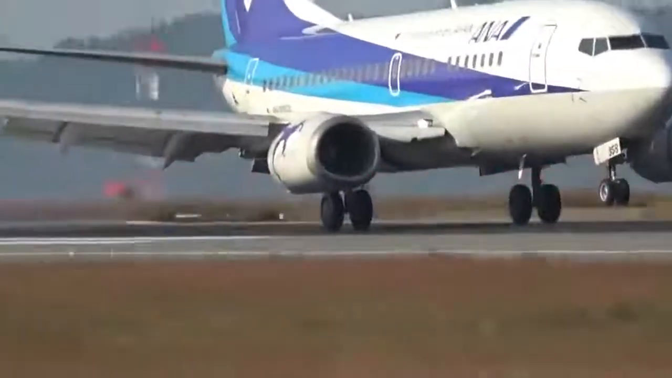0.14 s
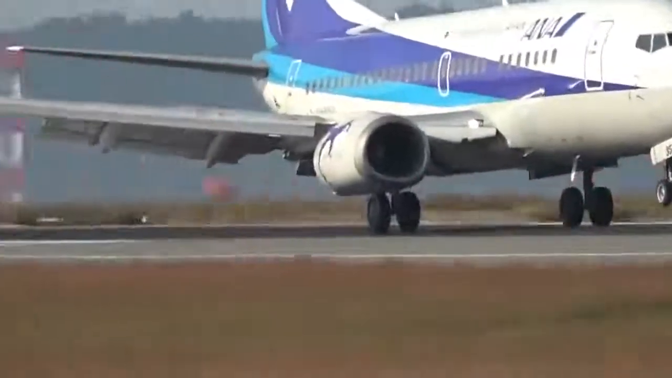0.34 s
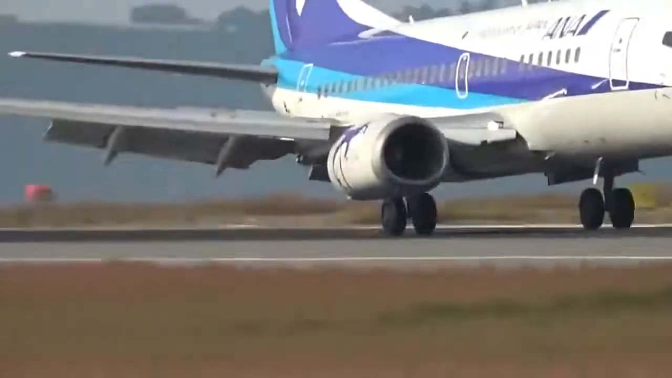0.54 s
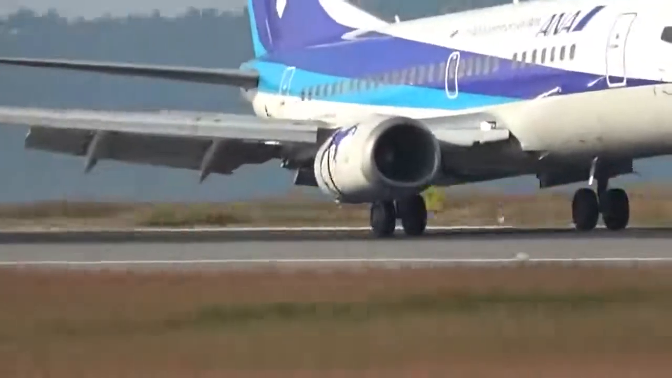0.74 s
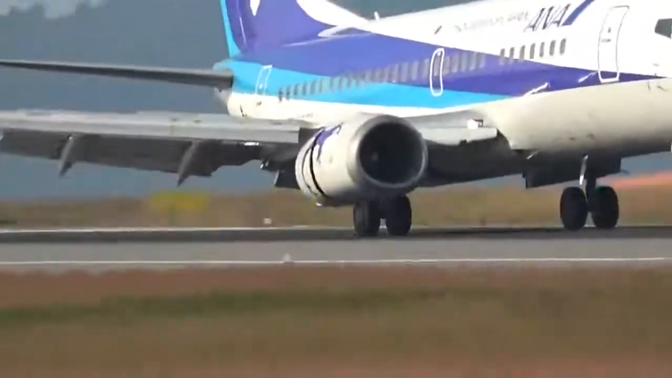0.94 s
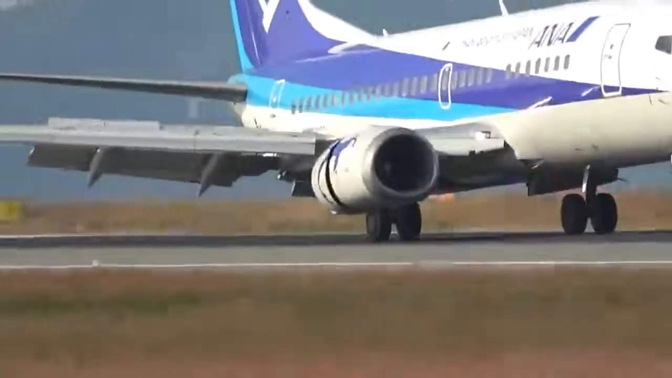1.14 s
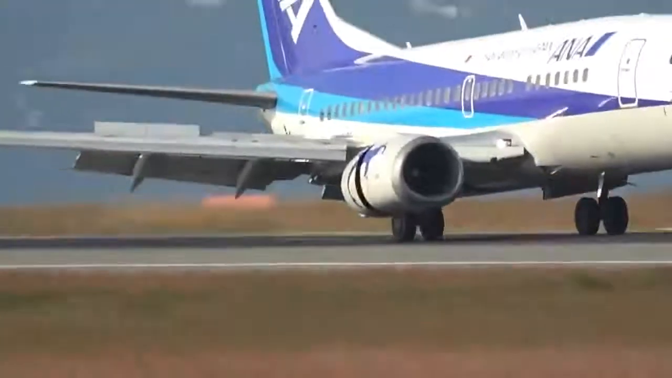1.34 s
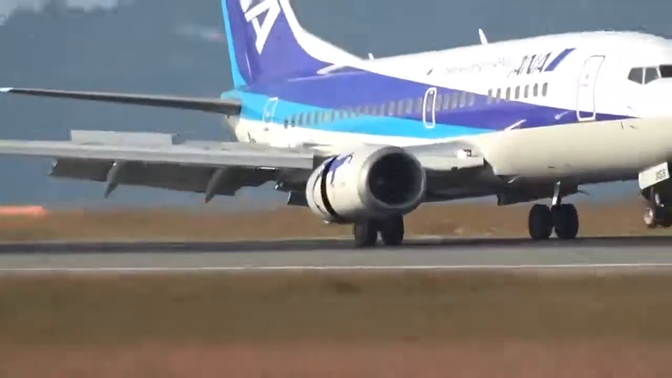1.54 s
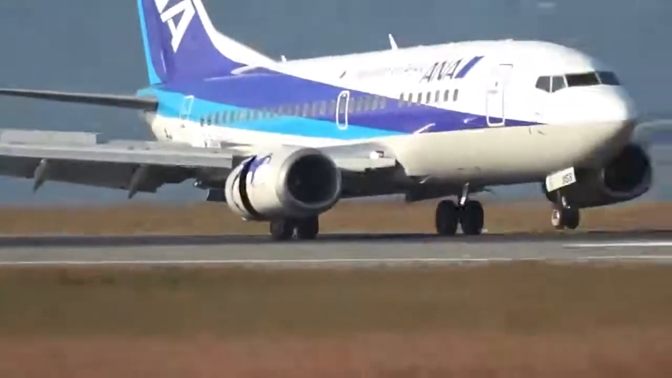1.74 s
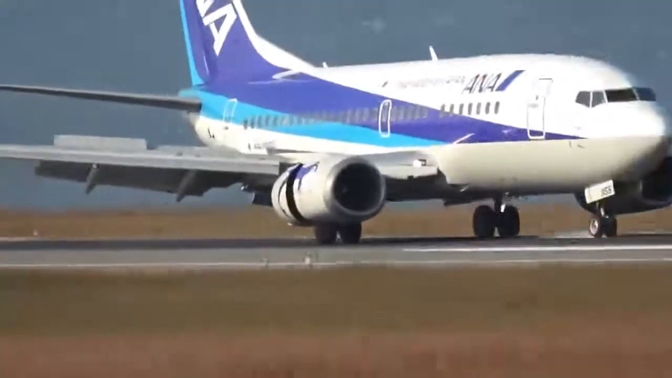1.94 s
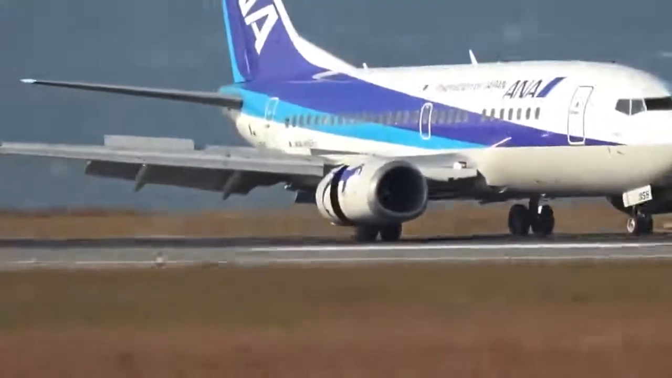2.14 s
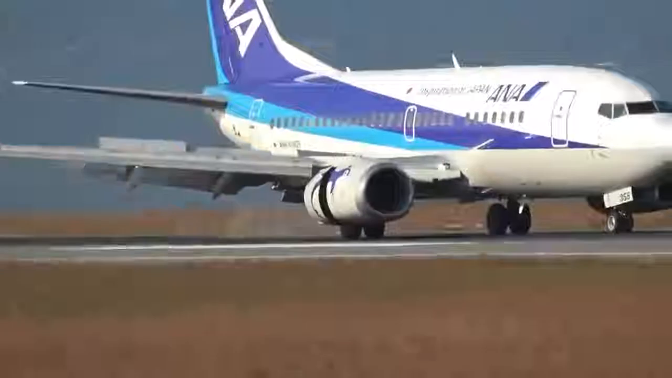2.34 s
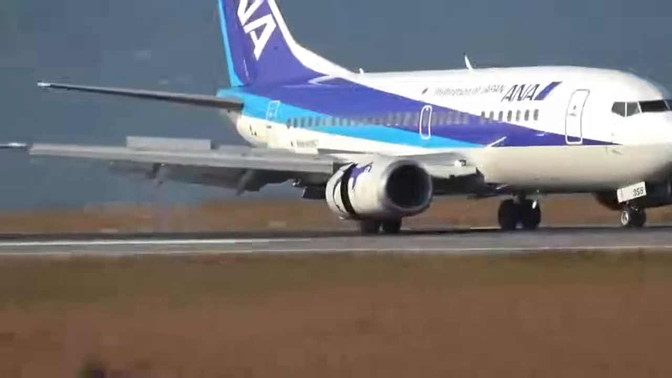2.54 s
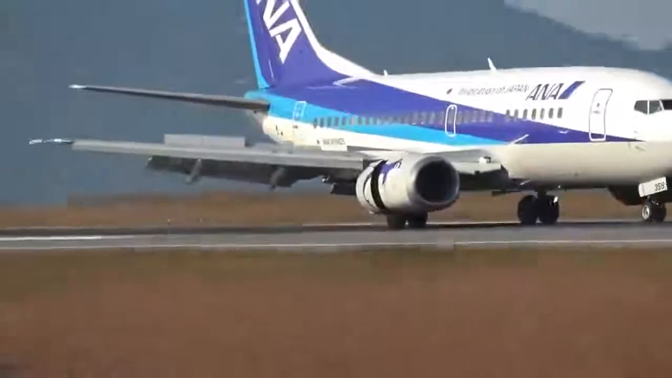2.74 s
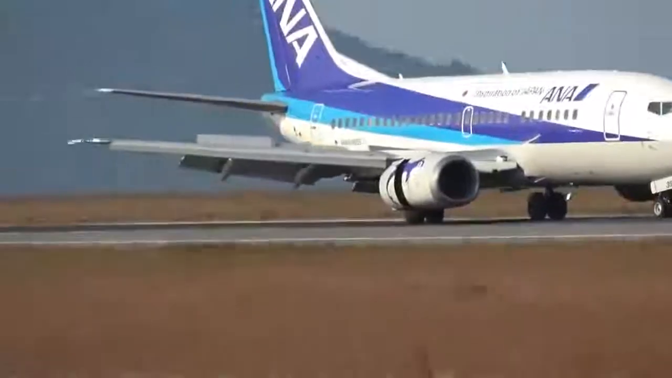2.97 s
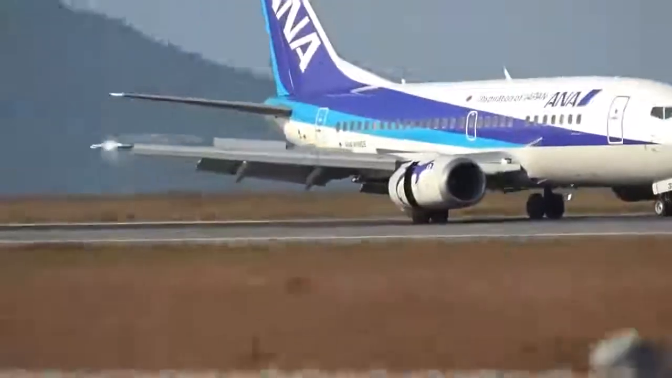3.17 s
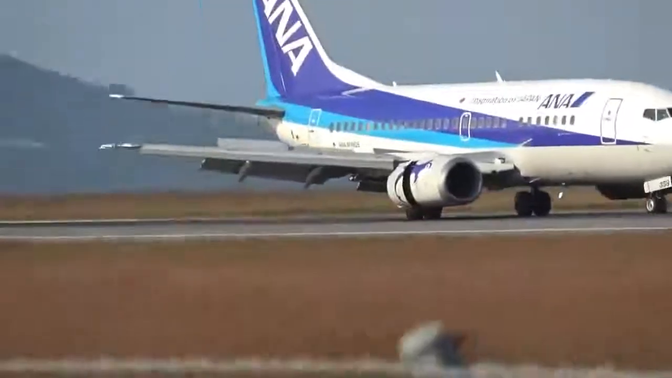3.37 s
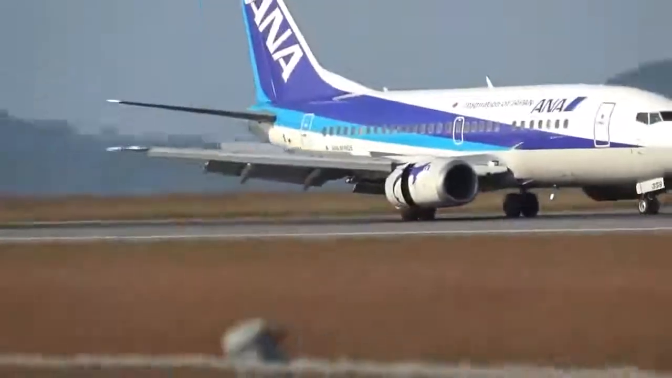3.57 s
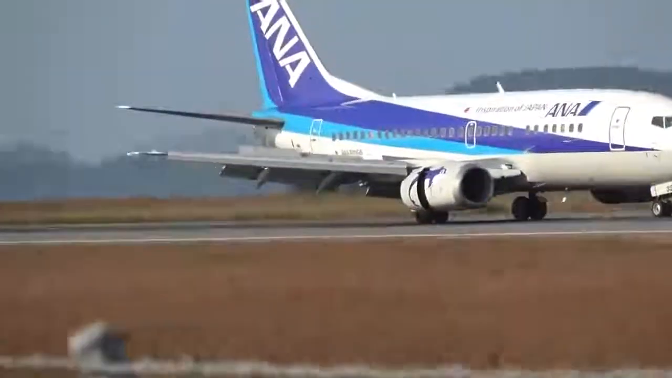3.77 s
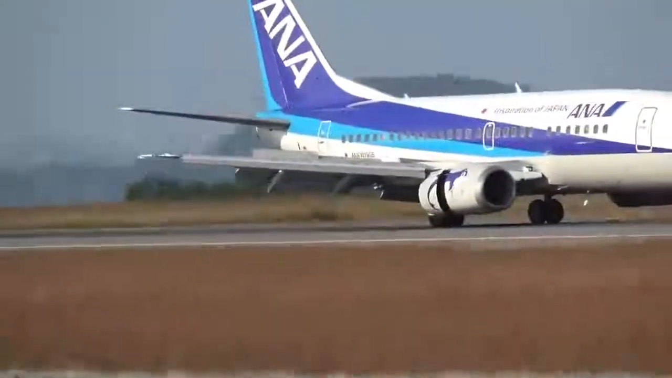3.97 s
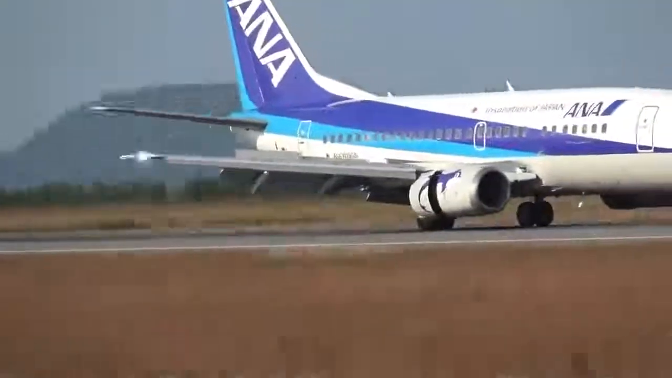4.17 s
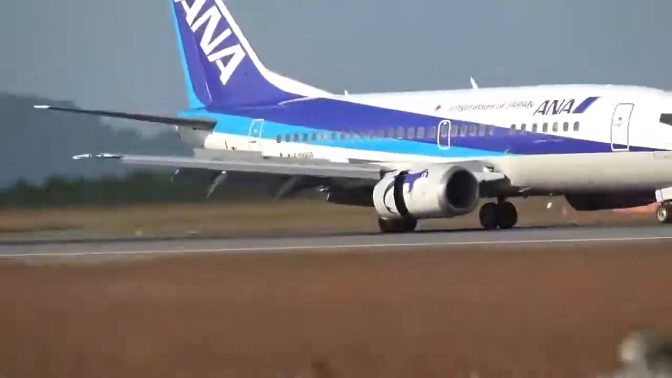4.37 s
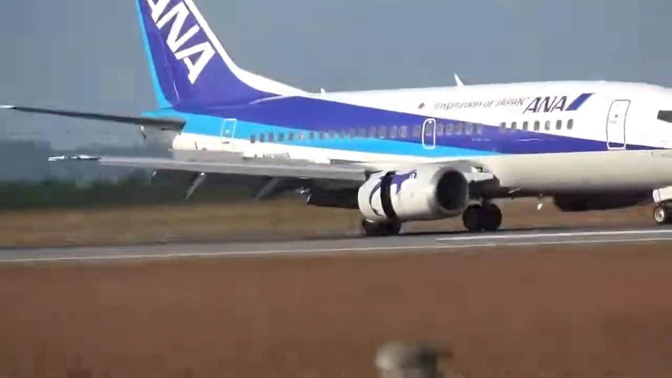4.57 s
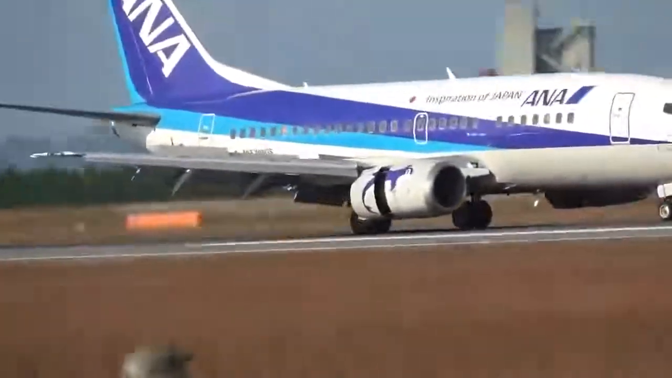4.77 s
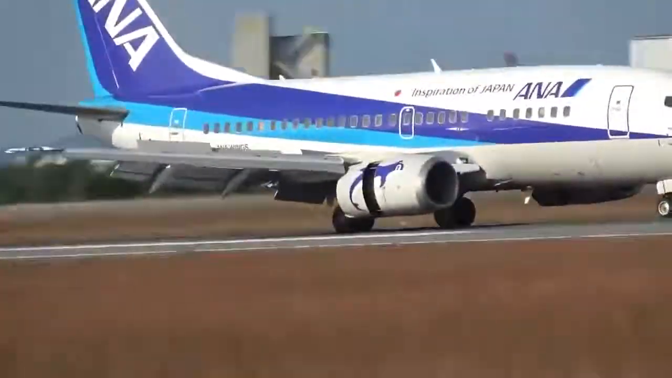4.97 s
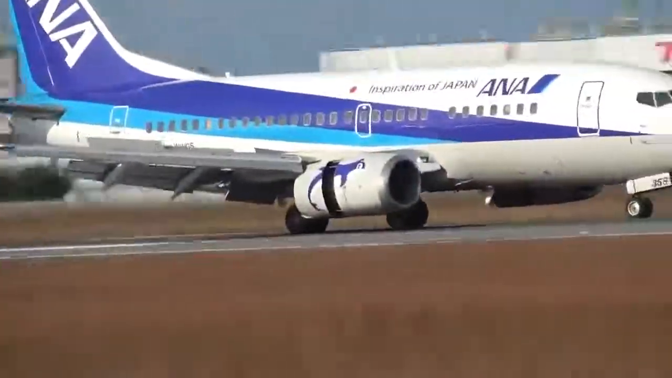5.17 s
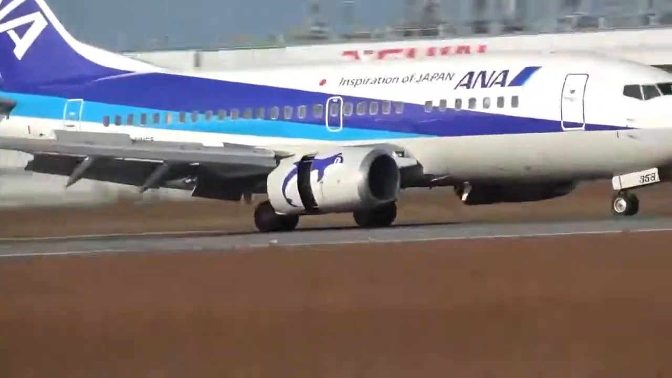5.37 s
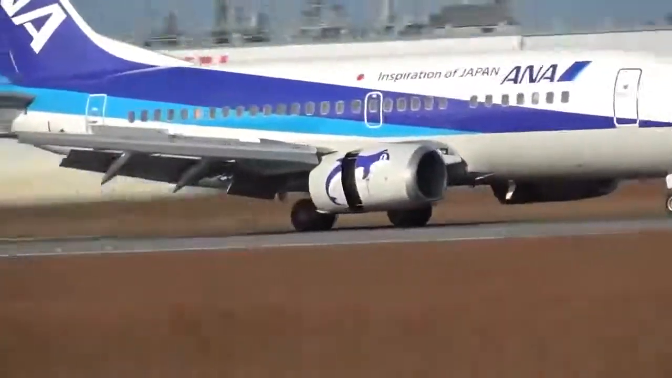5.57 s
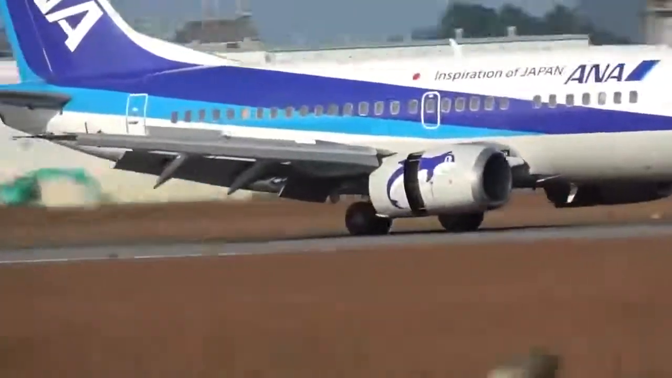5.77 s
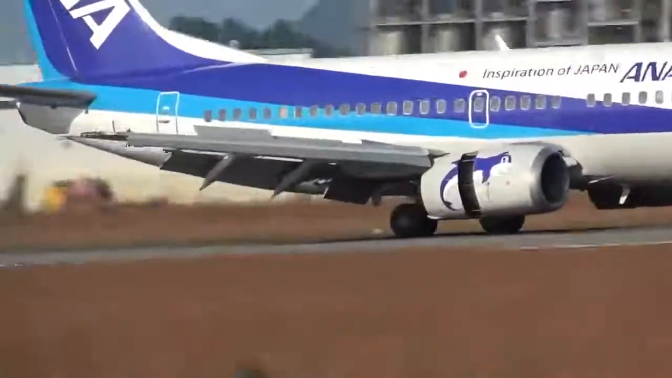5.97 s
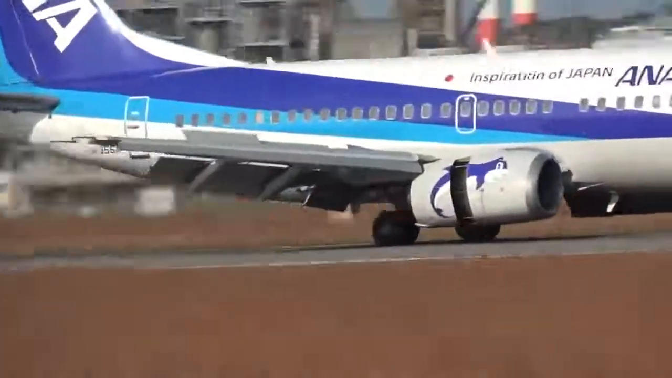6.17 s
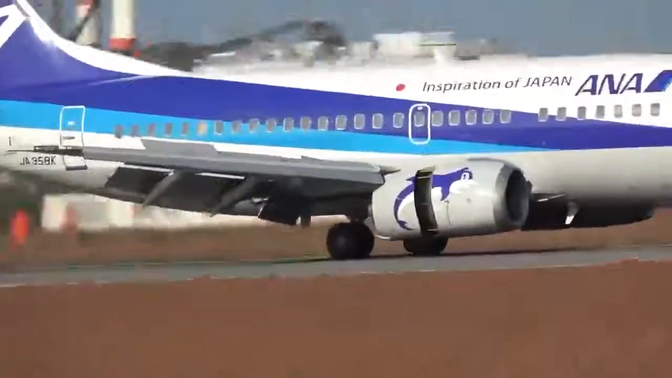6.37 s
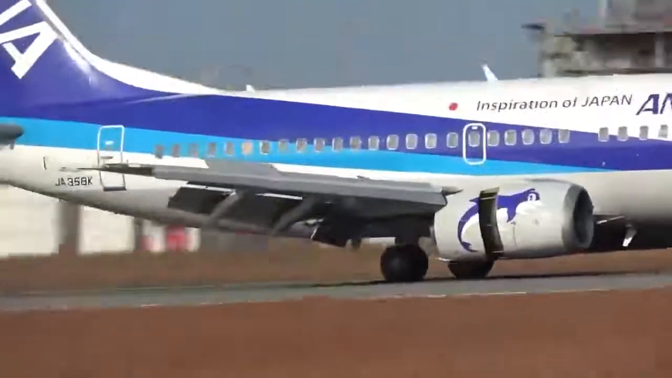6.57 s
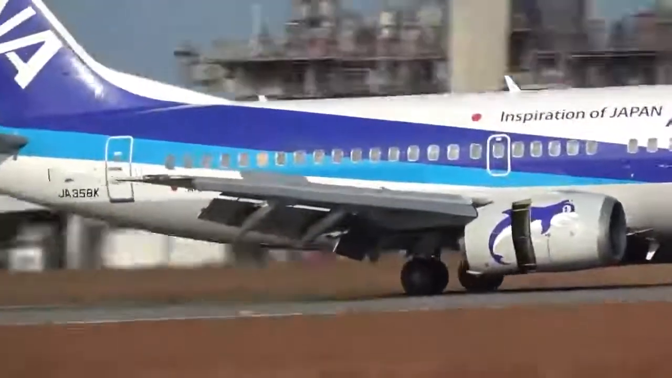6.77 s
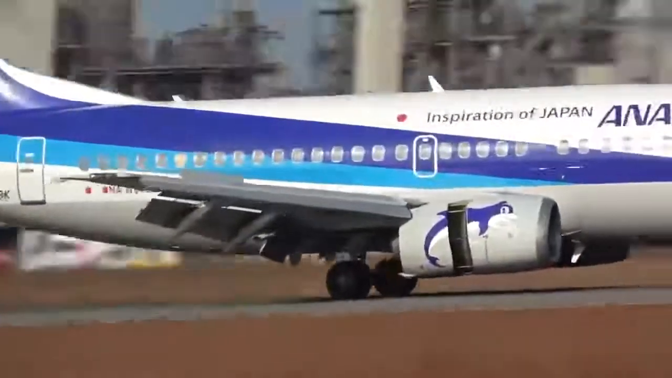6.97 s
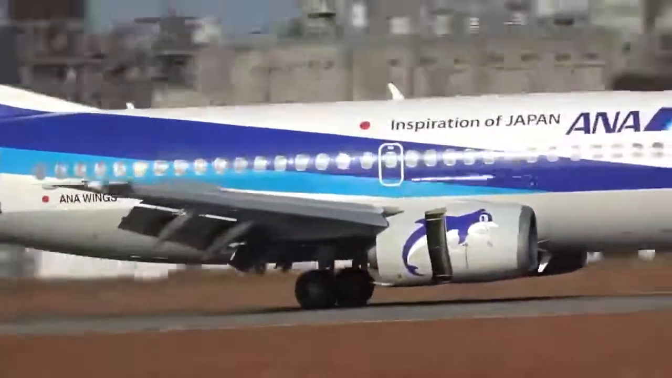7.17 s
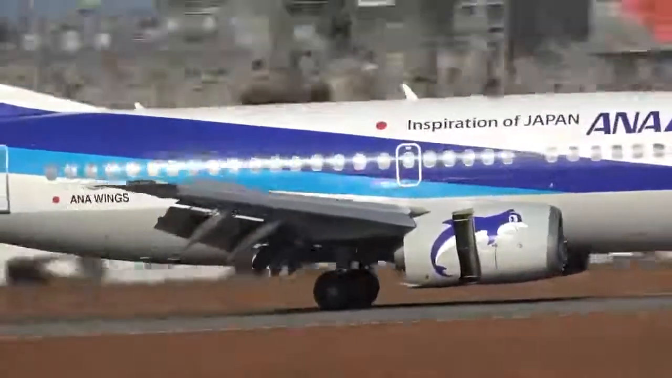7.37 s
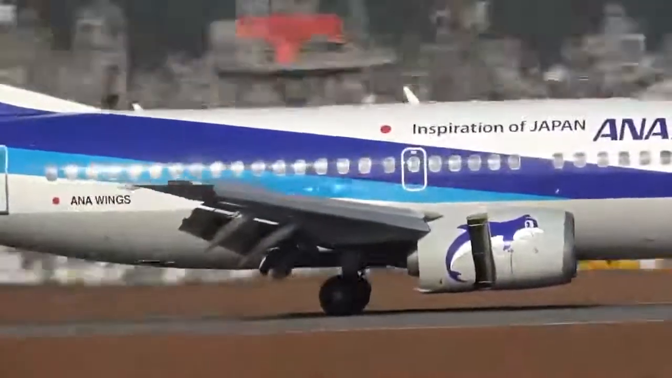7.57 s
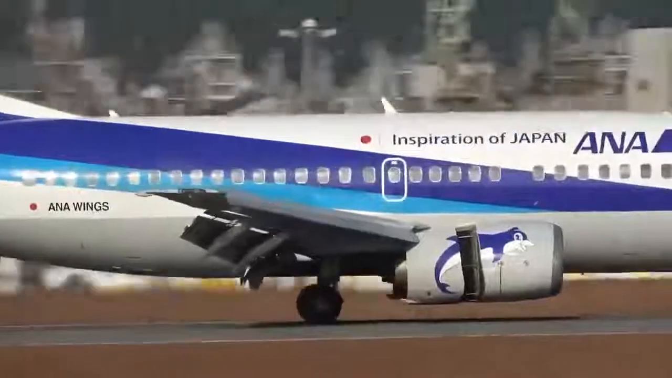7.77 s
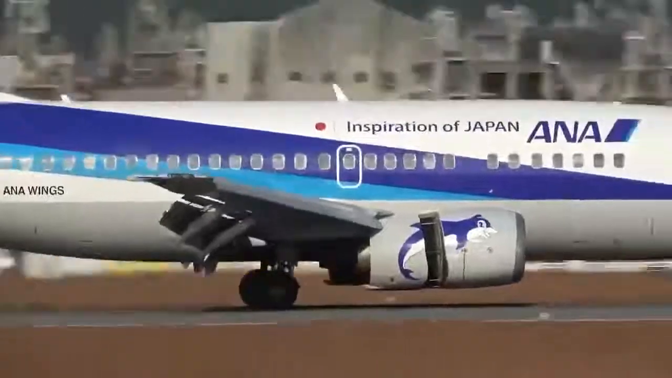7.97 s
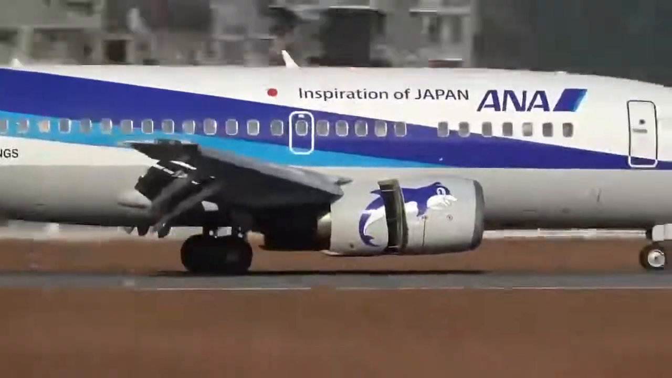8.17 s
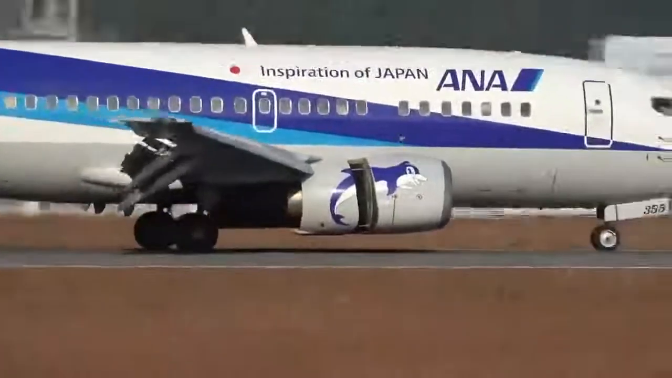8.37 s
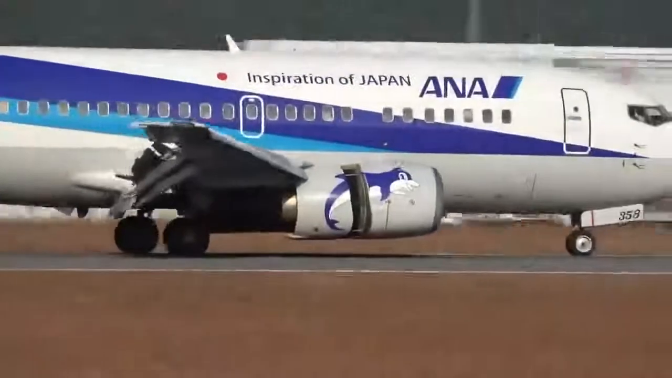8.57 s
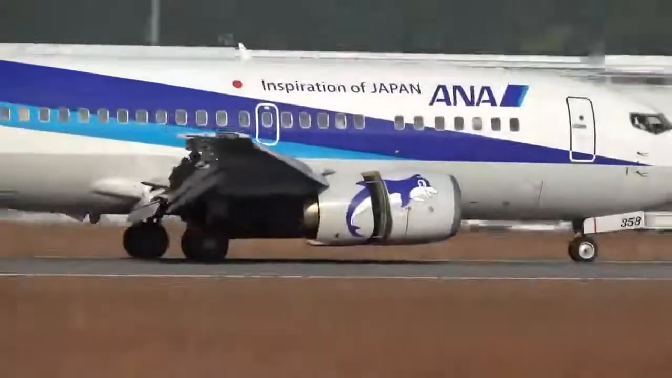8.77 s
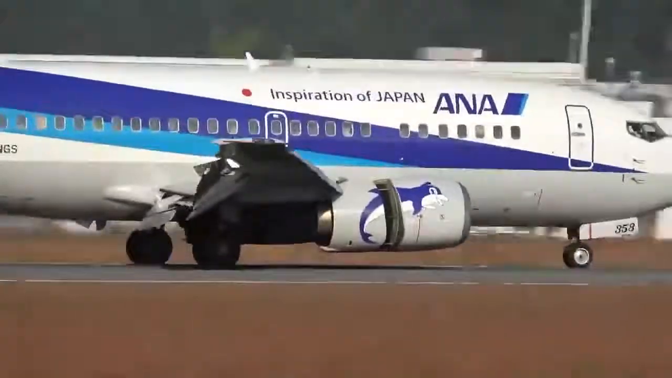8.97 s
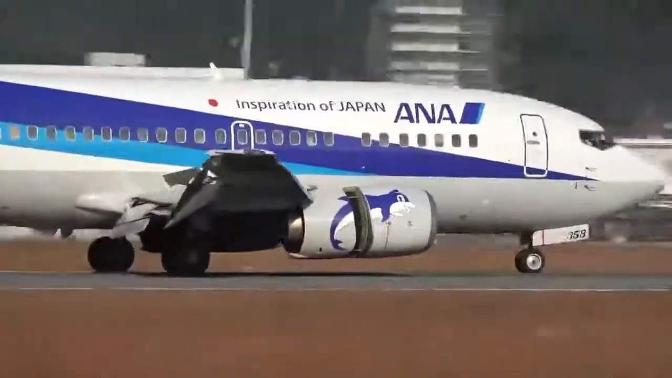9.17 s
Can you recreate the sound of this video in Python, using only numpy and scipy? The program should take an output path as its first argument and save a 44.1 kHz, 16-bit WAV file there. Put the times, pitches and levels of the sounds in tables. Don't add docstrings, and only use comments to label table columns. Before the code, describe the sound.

Across an open grass airfield, a distant airliner's engines drone faintly while wind softly thumps the microphone. Reverse thrust builds as it rolls closer, a fluttering roar with a descending fan tone and brief rising compressor whines. It becomes a loud, broad rush alongside, then eases slightly while still roaring.

```python
import sys
import numpy as np
from scipy import signal
from scipy.io import wavfile
from scipy.ndimage import uniform_filter1d, map_coordinates

SR = 44100
rng = np.random.default_rng(int(sys.argv[2]) if len(sys.argv) > 2 else 0)


def waveform_to_disk(signal):
    frames = np.transpose(np.atleast_2d(signal))
    scaled = np.clip(frames, -1, 1) * 32767
    samples = np.round(scaled).astype(np.int16)
    wavfile.write(sys.argv[1], SR, samples)


def gain_from_db(level_db):
    decades = np.asarray(level_db, float) / 20
    return 10 ** decades


N = 406602
FRAME = 1024
HZ = np.fft.rfftfreq(FRAME, 1 / SR)[:, None]
TIMES = np.arange(2 * N // FRAME + 2) * FRAME / 2 / SR
SECONDS = np.arange(N) / SR

# t/s, distance/km, grass dip f/Hz, roar centre f/Hz, rumble tilt/(dB per octave)
PATH = [(0, 0.84, 333, 784, -0.5), (.65, 0.8, 380, 780, -1.5), (1.05, 0.93, 375, 960, 2),
        (2.1, 0.65, 318, 930, 3.5), (2.8, 0.56, 365, 890, -2), (3.4, 0.39, 272, 940, 6),
        (3.9, 0.41, 250, 1040, -1), (5.2, 0.21, 269, 937, 1.5), (5.6, 0.12, 240, 825, 2.3),
        (6.1, 0.12, 248, 865, 4.5), (6.52, 0.15, 256, 860, -3.5), (6.72, 0.15, 308, 766, -1.5),
        (7.6, 0.12, 326, 800, 2.5), (8.2, 0.083, 392, 860, 1), (8.6, 0.1, 360, 890, 8.5),
        (9.22, 0.16, 342, 917, 2.5)]
# t/s, f/Hz
FAN_PITCH = [(.9, 2590), (1.7, 2550), (2.5, 2460), (3.5, 2325), (4.25, 2215), (4.6, 2140), (5.4, 2030),
             (6.1, 1900)]
# t/s, hiss swell/dB, half width/s
EDDIES = [(.03, 2, 0.05), (.72, 5, 0.14), (1.0, 10, 0.12), (1.34, 12, 0.16), (1.66, 8, 0.17),
          (1.93, 3, 0.041), (2.44, 6, 0.1), (2.88, 5.5, 0.046), (3.22, 5, 0.09), (3.52, 2.5, 0.07),
          (3.7, 3, 0.12), (3.9, 4.5, 0.064), (4.37, 6, 0.13), (4.75, -0.5, 0.095), (5.07, 3, 0.13),
          (5.58, 3, 0.085), (5.87, 4, .08), (6.09, 1, 0.062), (6.34, 4.5, 0.065), (6.65, 5, .08),
          (6.92, 0.5, 0.033), (7.25, 2.5, 0.12), (7.44, 3, 0.022), (7.64, 5.5, .06), (7.95, 4, .1),
          (8.15, 1, 0.086), (8.24, -1.5, .05), (8.4, 7, 0.057), (8.67, 1, 0.042), (8.84, 5.5, 0.15)]
RUSH_SWELL, ROAR_SWELL = 0.45, -0.28
BROADSIDE_S, TURN_S = 6.1, 0.15


def unit(x):
    return x / np.sqrt(np.mean(x ** 2) + 1e-20)


def along(points, hz):
    f, v = np.transpose(points)
    return np.interp(np.log(hz + 1), np.log(f + 1), v)


def curves(rows, t):
    s, *cols = np.transpose(rows)
    return [np.interp(t, s, c) for c in cols]


def swells(rows, t):
    return sum(db * np.exp(-((t - s) / width) ** 2) for s, db, width in rows)


def past(t, at_s):
    return (1 + np.tanh((t - at_s) / TURN_S)) / 2


def wobble(rate):
    knots = rng.standard_normal(int(N * 40 / SR))
    return map_coordinates(knots, [np.arange(N) * min(rate, 39) / SR])


def noise(gain):
    z = signal.stft(rng.standard_normal((2, N + FRAME)), nperseg=FRAME)[2][..., :len(TIMES)]
    return signal.istft(z * gain, nperseg=FRAME)[1][:, :N]


def field():
    # f/Hz, density/dB
    murmur = [(40, -2.5), (150, -12.5), (700, -4), (2000, -24), (5000, -27.5), (10800, -31), (11200, -120)]
    return gain_from_db(-48.5) * unit(noise(gain_from_db(along(murmur, HZ))))


def wind():
    # t/s, level/dB
    breeze = [(0, -41), (1.2, -41), (1.7, -45), (9.22, -50.5)]
    # f/Hz, density/dB
    buffet = [(10, -4), (30, 13.5), (60, -1), (120, -28), (300, -42.5), (800, -120)]
    # t/s, swell/dB, half width/s
    puffs = [
        (3.03, 14, .15),
        (4.0, 8.5, .3),
        (8.1, 7, .2),
    ]
    # t/s, peak level/dB, f/Hz, left-right/dB
    gusts = [
        (0.189, -23.5, 46.3, -12),
        (0.569, -33, 45.4, -17),
        (0.759, -25.5, 35.0, 9),
        (2.199, -32, 60, -6.0),
        (2.899, -41, 70.0, 0.5),
        (3.439, -35, 70.0, -3),
        (4.06, -22, 40.4, -16),
    ]
    lumps = gain_from_db(3 * wobble(9) + 2.5 * np.array([wobble(9), wobble(9)]))
    level_db = curves(breeze, SECONDS)[0] + swells(puffs, SECONDS)
    port_db = np.array([[5], [1.5]])
    out = gain_from_db(level_db + port_db) * unit(lumps * noise(gain_from_db(along(buffet, HZ))))
    for s, db, hz, pan_db in gusts:
        bell = np.exp(-((SECONDS - s - 0.012) / 0.017) ** 2)
        push = bell * np.sin(2 * np.pi * hz * (SECONDS - s))
        out += gain_from_db(db + np.array([[pan_db / 2], [-pan_db / 2]])) * push
    return out


def tone(rows, blur_hz, flutter_db, trim_db):
    hz, db = curves(rows, SECONDS)
    edge_s = np.minimum(SECONDS - rows[0][0] + 0.027, rows[-1][0] - SECONDS)
    fade = np.clip(edge_s / 0.2, 0, 1)
    phase = 2 * np.pi * np.cumsum(hz + blur_hz * wobble(30)) / SR
    return np.sqrt(2) * fade * gain_from_db(db + trim_db + flutter_db * wobble(12)) * np.sin(phase)


def idle_tones():
    # t/s, f/Hz, level/dB
    drone = [(0, 662, -48.5), (.25, 665, -54), (.6, 668, -54), (.95, 670, -50), (1.4, 660, -66)]
    # t/s, f/Hz, level/dB
    far_idle = [(1.1, 1915, -52), (1.5, 1870, -50), (1.95, 1836, -45), (2.35, 1824, -50), (2.6, 1790, -52)]
    near = tone(drone, blur_hz=7, flutter_db=3, trim_db=0)
    return near + tone(far_idle, blur_hz=60, flutter_db=2, trim_db=-2)


def layer_levels(t):
    # t/s, thrust level/dB, lift/dB
    thrust = [(0, -40, -9), (1.02, -40, -4.5), (1.3, -38.5, -8), (1.95, -34, 0), (2.6, -30.5, -10.5),
              (3.02, -26, -15.5), (3.35, -25, -2.5), (3.68, -21.5, -7.5), (3.82, -21, 1), (4.4, -25, 8.5),
              (4.9, -23, -0.5), (5.2, -21.5, 3.5), (5.8, -22.5, 8.5), (6.5, -20.5, 7), (6.66, -18, 2.5),
              (7.4, -18.5, 3), (8.9, -22, 8.5), (9.22, -23.5, 6.5)]
    thrust_db, lift_db = curves(thrust, t)
    swell_db, above_db = swells(EDDIES, t), thrust_db + 22
    roar_db = thrust_db + lift_db + ROAR_SWELL * swell_db
    rush_db = -22.5 + 1.08 * above_db + 0.48 * lift_db
    rush_db = rush_db - 3.5 * past(t, BROADSIDE_S)
    hiss_db = -33.5 + 0.57 * above_db + 0.26 * lift_db
    hiss_db = hiss_db - 16 * curves(PATH, t)[0]
    return thrust_db, roar_db, rush_db + RUSH_SWELL * swell_db, hiss_db + swell_db


def patches(depth_db):
    grain = rng.standard_normal((len(HZ), len(TIMES)))
    grain = uniform_filter1d(uniform_filter1d(grain, size=14, axis=0), size=7, axis=1)
    return gain_from_db(depth_db * unit(grain))


def in_band(shape, lo_hz, hi_hz, level_db):
    band = (HZ >= lo_hz) & (HZ < hi_hz)
    return shape * gain_from_db(level_db) / np.sqrt(np.sum(band * shape ** 2, axis=0) / len(HZ))


def octaves(centre_hz):
    return np.log2((HZ + 1) / centre_hz)


def jets():
    # f/Hz, density/dB
    rumble_points = [(20, -29.5), (40, -15.5), (70, -2), (120, 0.5), (165, -3), (200, -9.5), (225, -17.5),
                     (290, -5), (420, -13.5), (700, -19.5), (1200, -120)]
    # f/Hz, density/dB
    rush_points = [(200, -120), (400, -1), (900, 0), (1300, 3.5), (1900, 1.5), (2300, 0), (3000, -8.5),
                   (3800, -35.5), (5000, -17.5), (7000, -120)]
    # f/Hz, density/dB
    hiss_points = [(1500, -120), (2600, 3), (3300, 3), (4500, -1.5), (6000, -3), (7500, -7.5),
                   (9000, -17.5), (10900, -24), (11150, -120)]
    # f/Hz, side against mid level/dB
    side_points = [(60, -16), (110, -32.5), (190, -25), (340, -26), (600, -31.5), (1080, -22.5),
                   (1920, -22.5), (3420, -20), (6100, -18), (10900, -23)]
    rumble_db, roar_db, rush_db, hiss_db = layer_levels(TIMES)
    flutter_db = 1.1 * np.interp(TIMES, SECONDS, wobble(18))
    rush_db, hiss_db = rush_db + RUSH_SWELL * flutter_db, hiss_db + flutter_db
    km, dip_hz, roar_hz, tilt_db = curves(PATH, TIMES)

    air = gain_from_db(-km * 1.51 * (HZ / 1000) ** 1.81)
    dip_db = 10 + 1.5 * np.interp(TIMES, SECONDS, wobble(2.43))
    dip_db += 5.5 * (past(TIMES, 2.3) - past(TIMES, BROADSIDE_S))
    grass = gain_from_db(-dip_db * np.exp(-(octaves(dip_hz) / 0.59) ** 2))

    off_roar = octaves(roar_hz)
    hump = gain_from_db(-np.where(off_roar > 0, 40, 13) * np.abs(off_roar) ** 1.64)
    hump *= gain_from_db(1.4 * np.exp(-(octaves(0.958 * roar_hz) / 0.14) ** 2))
    rumble = gain_from_db(along(rumble_points, HZ) + tilt_db * np.minimum(octaves(79), 1.3))

    fan_ratio = 1.0 + 0.12 * (1 - past(TIMES, 3))
    fan_hz = np.maximum(fan_ratio * curves(FAN_PITCH, TIMES)[0], 2100)
    fan_db = -1.5 + (9.5 + 0.45 * swells(EDDIES, TIMES)) * km
    rush = gain_from_db(along(rush_points, HZ) + fan_db * np.exp(-(octaves(fan_hz) / 0.66) ** 2))
    hiss = gain_from_db(along(hiss_points, HZ))

    power = in_band(rumble * grass * patches(1.5), 55, 200, rumble_db) ** 2
    power += in_band(hump * patches(1.2), 450, 1600, roar_db + 0.045) ** 2
    power += in_band(rush * air * patches(1.69), 1473, 3020, rush_db - 0.6) ** 2
    power += in_band(hiss * air * patches(1.37), 3540, 5600, hiss_db - 0.6) ** 2
    side_gain = gain_from_db(along(side_points, HZ) + 5.5 + 8.5 * (HZ / 8000) ** 2)
    mid, side = noise(np.sqrt(power) * [np.ones_like(HZ), side_gain])
    return np.array([mid + side, mid - side])


def fan_tone():
    # t/s, swell/dB, half width/s
    blooms = [
        (2.2, 7, .07),
        (2.92, 11, .28),
        (3.82, 10, .11),
        (4.3, 8.5, .13),
        (5.75, 8, .2),
    ]
    s = np.arange(FAN_PITCH[0][0], FAN_PITCH[-1][0], 0.05)
    level_db = layer_levels(s)[2] - 18.5 + swells(blooms, s)
    rows = np.c_[s, curves(FAN_PITCH, s)[0], level_db]
    return tone(rows, blur_hz=18, flutter_db=2.5, trim_db=0)


def compressor_whines():
    # t/s, f/Hz, level/dB
    whine_far = [(3.4, 4330, -62), (3.7, 4500, -56), (4.1, 4830, -62), (4.6, 5250, -60), (5, 5720, -56),
                 (5.15, 5900, -62)]
    # t/s, f/Hz, level/dB
    whine_near = [(4.28, 4040, -60), (4.38, 4120, -50), (4.45, 4175, -35), (4.54, 4245, -45),
                  (4.78, 4445, -47), (4.88, 4560, -59), (5.1, 4880, -55), (5.21, 5080, -44),
                  (5.4, 5320, -60)]
    far = tone(whine_far, blur_hz=20, flutter_db=3, trim_db=0)
    return far + tone(whine_near, blur_hz=20, flutter_db=2.5, trim_db=1.5)


def scene():
    return field() + wind() + idle_tones() + jets() + fan_tone() + compressor_whines()


def band_db(z, edges):
    return 10 * np.log10(np.add.reduceat(np.abs(z) ** 2, edges) + 1e-20)


def starved(x, side_db, masked_db, scatter_db):
    # from t/s, to t/s, above f/Hz
    top_gaps = [
        (5.3, 5.55, 10100),
        (5.55, 5.82, 9700),
        (5.98, 6.25, 9900),
    ]
    # f/Hz, extra level/dB
    side_cost = [(650, 5), (1200, 2), (5200, 5), (6300, 13), (7300, 11), (8300, 1), (9400, 4), (9750, 19)]
    mid, side = signal.stft(np.array([x[0] + x[1], x[0] - x[1]]) / 2, nperseg=2 * FRAME)[2]
    edges = np.r_[0, np.arange(8, 40, 4), np.arange(40, 100, 6), np.arange(100, len(mid), 9)]
    band = np.searchsorted(edges, np.arange(len(mid)), side="right") - 1
    hz = edges[:, None] * SR / 2 / FRAME
    mid_db = band_db(mid, edges)
    loudest_db = mid_db.max(axis=0)
    luck = rng.standard_normal((2, len(edges), mid.shape[1]))
    luck = scatter_db * uniform_filter1d(luck, size=4, axis=2)

    step_db = 1.17 * uniform_filter1d(loudest_db, size=9) - masked_db + luck[0]
    step_db = np.minimum(step_db, mid_db - 10.5)
    local = uniform_filter1d(uniform_filter1d(np.abs(mid), size=3, axis=0), size=2, axis=1)
    heard = (local > gain_from_db(step_db)[band]) | ((hz < 4700) | (hz > 9600))[band]
    frame_s = np.arange(mid.shape[1]) * FRAME / SR
    for start, end, top_hz in top_gaps:
        heard &= ~((hz > top_hz) & (frame_s > start) & (frame_s < end))[band]

    luck[1] += 3 * rng.standard_normal(mid.shape[1]) - along(side_cost, hz)
    luck[1] -= 0.2 * (loudest_db - loudest_db.mean())
    needed_db = mid_db + side_db + 4.5 * np.log2(1 + hz / 1500)
    wide = (band_db(side, edges) + luck[1] > needed_db) | (hz < 170)
    kept = [mid * heard, side * (wide[band] & heard)]
    mid, side = signal.istft(kept, nperseg=2 * FRAME)[1][:, :N]
    return np.array([mid + side, mid - side])


def roll_off(x):
    return signal.sosfilt(signal.butter(12, 11470, fs=SR, output="sos"), x)


def record(dry):
    x = dry / (1 + np.abs(dry / 0.99) ** 8) ** (1 / 8)
    mix = starved(x, side_db=-23, masked_db=59.5, scatter_db=9.0)
    return roll_off(mix)


dry = scene()
out = record(dry)
waveform_to_disk(out)
```